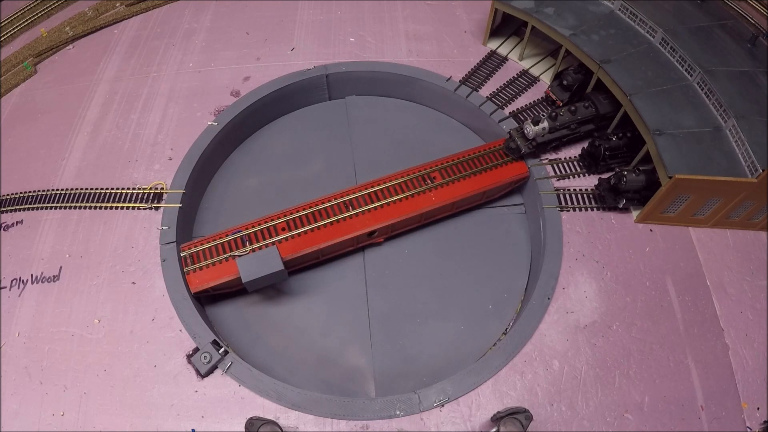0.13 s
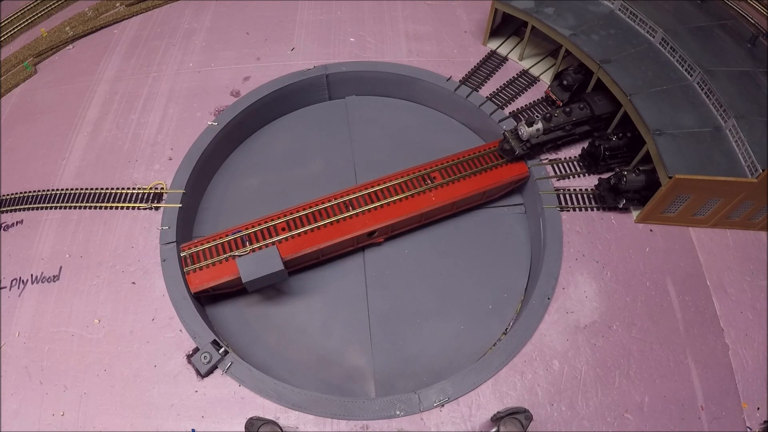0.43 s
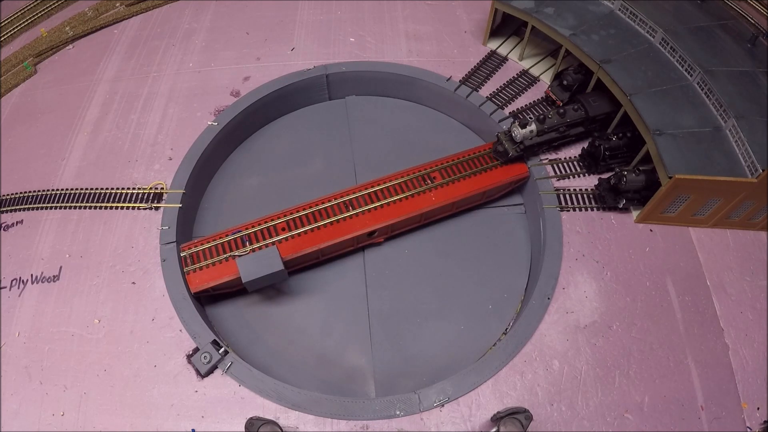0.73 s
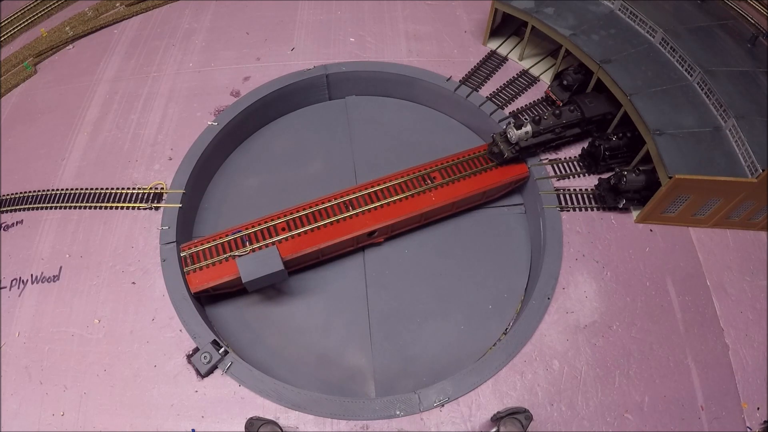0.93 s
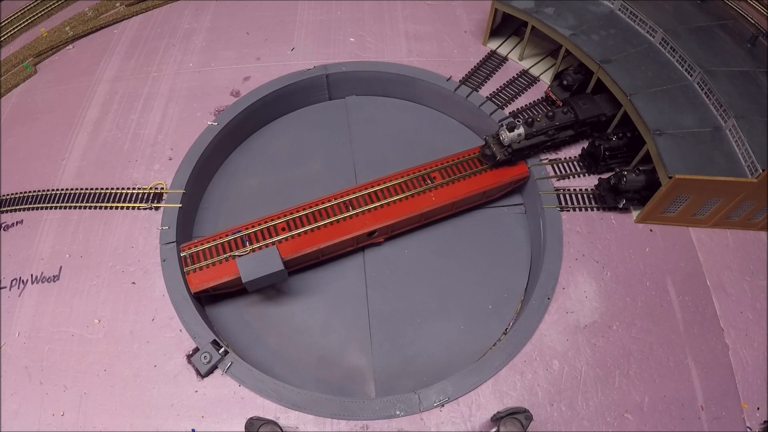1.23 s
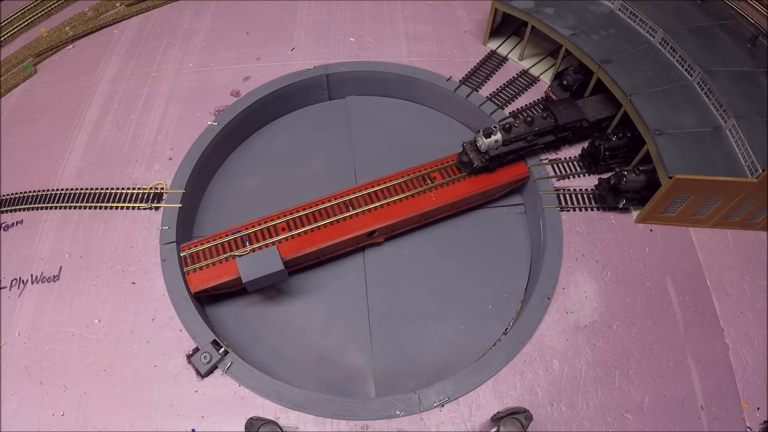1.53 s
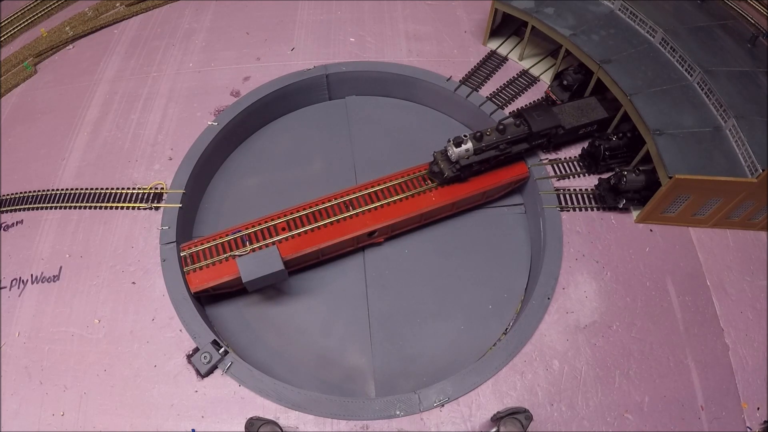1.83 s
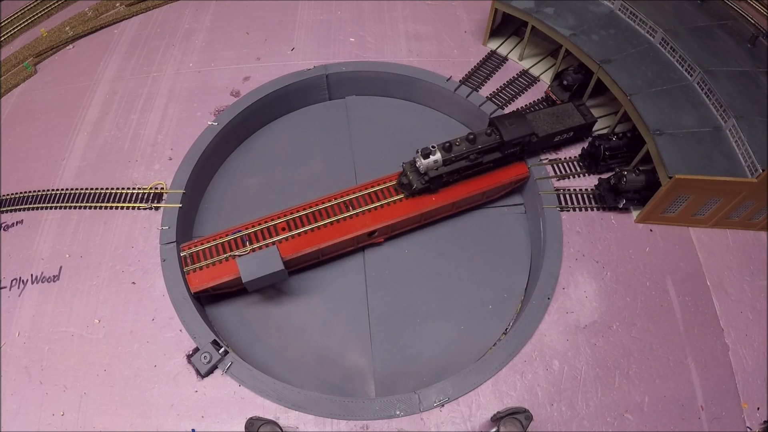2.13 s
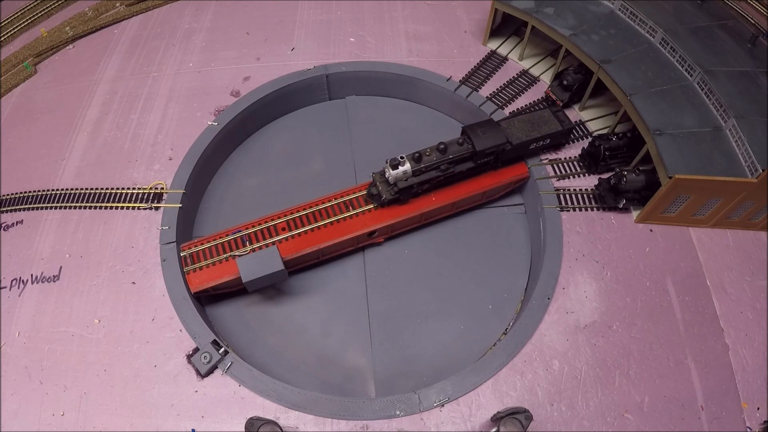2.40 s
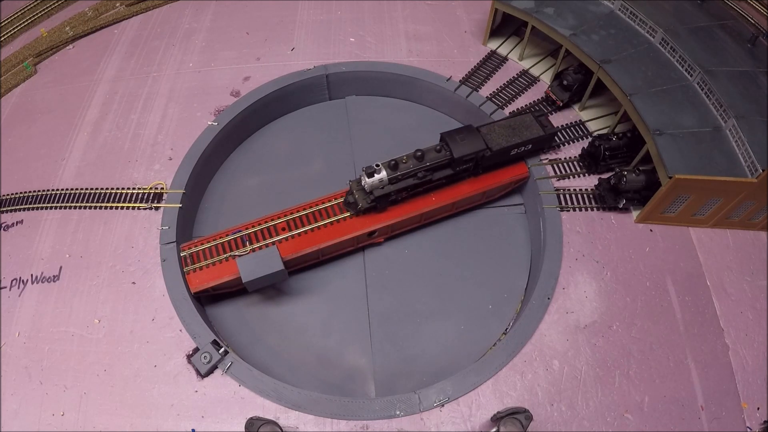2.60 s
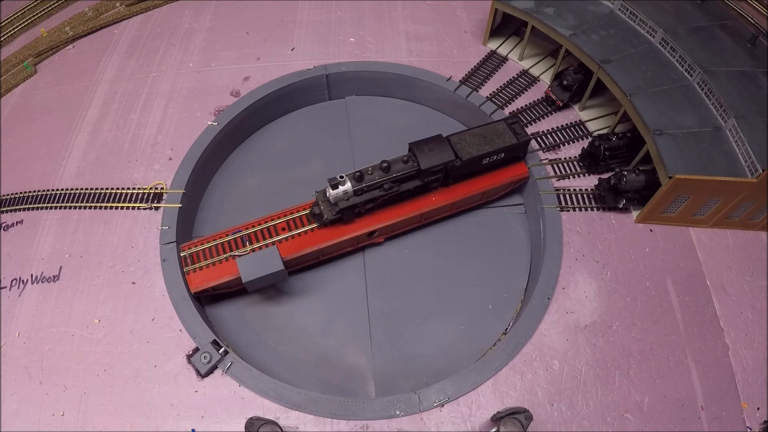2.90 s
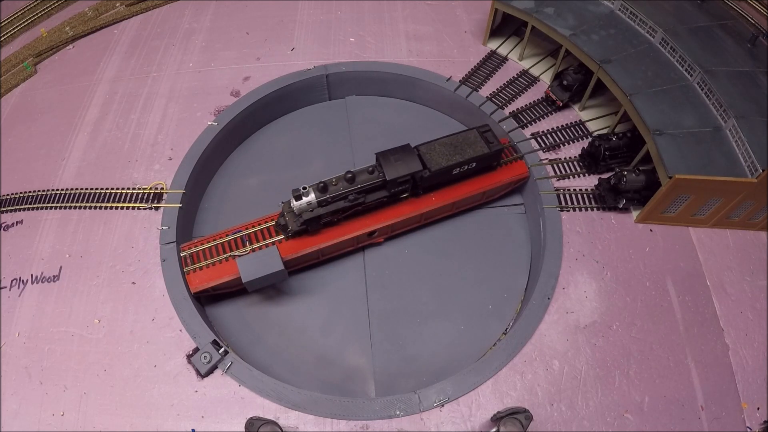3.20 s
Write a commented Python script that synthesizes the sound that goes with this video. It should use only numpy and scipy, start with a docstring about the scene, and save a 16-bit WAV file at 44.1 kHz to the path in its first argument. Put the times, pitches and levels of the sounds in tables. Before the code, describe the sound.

Deep beating hum over soft low room noise, first almost alone, then a tiny locomotive's gritty wheels, thin motor hiss, rail-gap clicks and dull bridge knocks join it, close microphone, short indoor reverberation.

```python
"""A low hum hangs over a model railway: the harmonics of something turning about twelve times a second,
throbbing as they beat. A small locomotive creeps onto the turntable bridge: its wheels grind on the rails
(random tiny impacts through ringing metal), the board rumbles (filtered noise), brief drifting tones swell
and the motor brushes hiss (pulsing noise). The wheels tick over the rail gaps and the bridge knocks
(short bursts of noise), in a small, quiet room."""
import sys
import numpy as np
from scipy import signal
from scipy.fft import rfft, irfft
from scipy.io import wavfile
from scipy.ndimage import uniform_filter1d

SR = 44100
rng = np.random.default_rng(int(sys.argv[2]) if len(sys.argv) > 2 else 0)


def unload_audio(sound):
    """Save the sound as a 16-bit wav file, at the path given as the first command line argument."""
    columns = np.transpose(np.atleast_2d(sound))
    # keep every value between -1 and 1, then stretch to whole-number steps
    steps = np.round(np.clip(columns, -1, 1) * 32767)
    wavfile.write(sys.argv[1], SR, steps.astype(np.int16))


N = 147735

# how loud the rolling is over time: time_s, wheel_level_db, board_level_db
ROLLING = [(0, -70, -49.5), (1.15, -64, -51.5), (1.35, -55, -42.5), (1.55, -51.5, -40), (1.8, -49.5, -36.5),
           (2.1, -49, -43), (2.4, -49.5, -38), (2.7, -51.5, -44.5), (3.1, -53.5, -42), (3.35, -56, -40.5)]


def undb(db):
    """Turn decibels into a gain."""
    return 10 ** (np.asarray(db) / 20)


def seconds():
    """Time of every sample."""
    return np.arange(N) / SR


def curve(table, axis=1):
    """One column of a table, joined by straight lines in time."""
    rows = np.array(table, float)
    return np.interp(seconds(), rows[:, 0], rows[:, axis])


def unit(x):
    """Scale to an average (rms) level of 1."""
    return x / np.sqrt(np.mean(x ** 2))


def colour(x, points):
    """Filter x by a tone curve of (Hz, dB) points, then scale to rms 1."""
    hz, db = np.array(points, float).T
    bins = np.maximum(np.fft.rfftfreq(N, 1 / SR), 1)
    gain = undb(np.interp(np.log(bins), np.log(hz), db))
    return unit(irfft(rfft(x) * gain, N))


def noise(points):
    """Noise with the given tone curve, at rms 1."""
    return colour(rng.standard_normal(N), points)


def walk(rate):
    """Slow random drift with a spread near 1, from about `rate` random values a second, smoothed."""
    hold = int(SR / rate)
    steps = np.repeat(rng.standard_normal(N // hold + 1), hold)
    smooth = uniform_filter1d(uniform_filter1d(steps, hold), hold)
    return unit(smooth[:N])


def resonate(x, rings):
    """Add resonances to x; each swells and fades as the contact points move."""
    swell_db, swells_per_s = 3.5, 12
    out = x
    for hz, width, db in rings:
        ring = signal.lfilter(*signal.iirpeak(hz, hz / width, fs=SR), x)
        out = out + undb(db + swell_db * walk(swells_per_s)) * ring
    return out


def strike(start, attack, t60):
    """Loudness of a blow: a quick rise and an exponential fall (60 dB in t60 seconds)."""
    age = np.maximum(seconds() - start, 0)
    return (1 - np.exp(-age / attack)) * np.exp(-np.log(1000) * age / t60)


def tone(angle):
    """A cosine at rms 1."""
    return np.sqrt(2) * np.cos(angle)


def air():
    """Steady room noise with faint, thin, steady whines."""
    # tone of the room noise: pitch_hz, level_db
    air_colour = [(20, 16), (40, 14.5), (85, 19), (130, 10), (200, 4.5), (300, -4.5), (450, -13.5),
                  (700, -16), (1200, -22), (2300, -24.5), (3200, -30), (5000, -32), (8200, -31),
                  (10500, -31), (12500, -39.5), (15000, -49)]
    # faint steady whines: pitch_hz, level_db
    whines = [(8211, -80.5), (12288, -89)]
    air_db = -33.5
    out = undb(air_db) * noise(air_colour)
    for hz, db in whines:
        out = out + undb(db) * np.sqrt(2) * np.sin(2 * np.pi * hz * seconds())
    return out


def room(x):
    """Nearby walls return a short, blurred tail, made here from fading noise."""
    t60_s, tail_db = 0.34, -10.5
    tail = rng.standard_normal(N) * strike(start=0.0035, attack=0.0024, t60=t60_s)
    tail = tail / np.linalg.norm(tail)
    return x + undb(tail_db) * signal.fftconvolve(x, tail)[:N]


def drifting_tones():
    """Brief drifting tones: swells of the hum's 6th harmonic and later its 12th and 13th, the board droning and
    the rail singing."""
    # the tones: start_s, length_s, pitch_hz, width_hz (sets size and speed of the drift), level_db
    tone_table = [(0.7, 0.57, 70, 9, -33), (1.35, 0.3, 306, 20, -45.5), (1.726, 0.13, 312, 14, -47),
                  (1.98, 0.2, 154, 10, -38), (2.19, 0.25, 163, 9, -37), (2.21, 0.06, 490, 90, -47),
                  (1.98, .035, 3450, 130, -57), (2.018, 0.02, 3630, 200, -57)]
    out = 0
    for start, length, hz, width, db in tone_table:
        progress = np.clip((seconds() - start) / length, 0, 1)
        swell = np.sqrt(np.maximum(np.sin(np.pi * progress), 0))
        pitch_hz = hz + .5 * width * walk(4 * width)
        phase = 2 * np.pi * np.cumsum(pitch_hz) / SR
        out = out + swell * undb(db + 1.8 * walk(width)) * np.sqrt(2) * np.sin(phase)
    return out


def board():
    """The baseboard rumbles under the rolling weight and rings at its resonances."""
    # tone of the rumble: pitch_hz, level_db
    board_colour = [(60, 6), (130, -6.5), (220, -1.5), (270, -5.5), (308, -3), (335, -6.5), (470, -11),
                    (540, -29), (900, -45)]
    # resonances of the board: pitch_hz, width_hz, gain_db
    board_rings = [(212.3, 14, -5), (304, 13, -3), (466, 29, -4.5)]
    rumble = resonate(noise(board_colour), board_rings)
    return unit(rumble) * undb(curve(ROLLING, axis=2))


def knocks():
    """Dull thuds of the bridge taking the load, with a brief ring of its deck."""
    # the bridge knocking under the wheels: start_s, thud_db, ring_db
    knock_table = [(1.566, -26.5, -51), (1.826, -34.5, -48), (2.08, -37, -46.5), (2.22, -37, -58),
                   (2.383, -34, -54), (2.71, -27, -68), (2.872, -31.5, -40.5), (2.93, -36.5, -62)]
    # tone of the thuds: pitch_hz, level_db
    knock_colour = [(40, -28), (140, 7.5), (200, -1), (290, -0.5), (380, -12.5), (600, -44), (1500, -59)]
    # ringing tones of the deck: pitch_hz, level_db (added to ring_db), t60_s
    bridge_modes = [(863, 2, 0.1), (824, -8, 0.16), (893, -12, 0.052), (2410, -5, 0.062)]
    thud_shape, ring = 0, 0
    for start, thud_db, ring_db in knock_table:
        thud_shape = thud_shape + undb(thud_db) * strike(start, attack=0.0046, t60=0.3)
        for hz, db, t60 in bridge_modes:
            wave = np.sin(2 * np.pi * hz * (seconds() - start))
            ring = ring + undb(ring_db + db) * strike(start, attack=0.0021, t60=t60) * wave
    return noise(knock_colour) * thud_shape + ring


def ticks():
    """The wheels click over the rail gaps: short bursts of noise."""
    # the ticks: start_s, level_db
    tick_table = [(0.446, -48.5), (1.228, -43), (1.256, -45), (1.367, -49), (1.49, -43.5), (1.571, -44),
                  (1.77, -41), (1.814, -41.5), (1.886, -42), (2.29, -41), (2.374, -41), (2.53, -41),
                  (2.871, -43.5), (2.97, -48), (3.058, -43.5), (3.09, -44)]
    # tone of the ticks: pitch_hz, level_db
    tick_colour = [(300, 6), (900, 4), (1500, 3), (2500, -3), (3600, -2), (5000, -9.5), (9000, -12.5),
                   (15000, -39)]
    shape = sum(undb(db) * strike(start, attack=.001, t60=.06) for start, db in tick_table)
    return noise(tick_colour) * shape


def brushes():
    """Brushes hiss on the commutator, swelling once and twice a motor turn."""
    # how loud the hiss is: time_s, level_db
    brush_level = [(0, -80), (1.15, -69.5), (1.35, -64.5), (1.65, -60), (1.85, -62.5), (2.2, -59),
                   (2.7, -59), (3.17, -60), (3.25, -64), (3.35, -71)]
    # tone of the hiss: pitch_hz, level_db
    brush_colour = [(3000, -11.5), (5000, -7.5), (5400, -2.5), (5800, -7), (6250, 6), (7000, -5),
                    (7500, 0.5), (8300, 2), (9000, -3.5), (10000, -5), (11200, -22), (12600, -6),
                    (13400, -3), (14200, -14), (15500, -8)]
    motor_hz, swell_depth = 105.5, .14
    turns_per_s = motor_hz * (1 + 0.022 * walk(3.3))
    angle = 2 * np.pi * np.cumsum(turns_per_s) / SR
    swell = 1 + swell_depth * (np.cos(2 * angle) + np.cos(angle))
    return noise(brush_colour) * swell * undb(curve(brush_level))


def wheels():
    """Tiny impacts of wheels on gritty rail ring the metal; the gears drive them in uneven surges."""
    # tone of the grinding: pitch_hz, level_db
    wheel_colour = [(400, 7), (600, 7.5), (1000, 2.5), (1700, 3.5), (2400, 0.5), (3000, -3), (3800, -5),
                    (4800, -9.5), (7000, -13.5), (10000, -27), (15000, -23)]
    # resonances of the metal: pitch_hz, width_hz, gain_db
    wheel_rings = [(810, 64, -13.5), (1346, 145, -2), (2435, 130, -6.5), (3510, 160, -6.5)]
    hits_per_s, hit_spread_db, hit_limit_db = 500, 3.5, 10
    hit = rng.random(N) < hits_per_s / SR
    hit_db = np.minimum(hit_spread_db * rng.exponential(size=N), hit_limit_db)
    grit = hit * rng.choice([-1, 1], N) * undb(hit_db)
    # smooth noise fills in between the hits
    grind = colour(unit(grit) + .8 * rng.standard_normal(N), wheel_colour)
    # a fast and a slow random drift of the level, in dB
    surge_db = 1.0 * walk(90) + .5 * walk(14)
    return unit(resonate(grind, wheel_rings)) * undb(curve(ROLLING) + surge_db)


def hum():
    """Harmonics of one slow rotation; 4th and 5th beat once a turn, 8th to 10th about a third of a turn later."""
    # the rotation: time_s, turns_per_s, fifth_harmonic_db, fourth_harmonic_db, ninth_harmonic_db
    rotation = [(0.0, 11.7, -23.0, -28, -30), (0.1, 11.71, -22.0, -28, -30), (0.26, 11.9, -17.0, -40, -26),
                (0.52, 11.62, -19.0, -23, -27), (0.72, 11.78, -17.0, -22, -26),
                (0.86, 11.83, -17.0, -35, -27), (1.1, 11.7, -15.0, -27, -23.5),
                (1.3, 11.67, -15.3, -23.5, -23.5), (1.56, 11.71, -15.5, -22, -25),
                (1.61, 11.73, -23.0, -29, -27), (1.69, 11.97, -33.0, -38, -32),
                (1.8, 12.23, -18.5, -38, -41), (1.95, 13.2, -26.5, -37, -62),
                (2.14, 13.63, -43.0, -41, -54), (2.27, 13.45, -31.0, -43, -59),
                (2.42, 12.75, -23.5, -44, -57), (2.62, 11.78, -23.0, -36, -49),
                (2.9, 11.5, -20.5, -39, -39), (3.04, 10.7, -31.0, -45, -51), (3.2, 10.74, -29.0, -46, -47),
                (3.35, 10.68, -27.0, -41, -43)]
    # brief dips of the 4th and 5th harmonics: centre_s, change_db
    dips = [(0.447, -5), (1.597, -11), (2.21, -10), (2.64, -12), (3.07, -10), (3.23, -10)]
    # how loud the 10th harmonic is: time_s, level_db
    tenth = [(0, -47), (.75, -56), (1, -28), (1.5, -55), (1.9, -55), (2.7, -64), (2.92, -32.5), (3.25, -31),
             (3.35, -31.5)]
    # weaker harmonics: multiple, level_db, share (of the 5th's rise and fall that they follow)
    overtones = [(3, -46.5, 0.61), (6, -41, 0), (7, -44, 0.36), (11, -57, 0), (13, -53, 0)]
    first_throb_s, upper_lag_turns, dip_s = .06, .323, .014
    eighth_db = -7  # relative to the 9th
    wobble_db, wobble_rad = 2, 1.3

    rate, fifth_db = curve(rotation), curve(rotation, axis=2)
    angle = 2 * np.pi * (np.cumsum(rate) / SR - first_throb_s * rate[0])
    late_angle = angle - 2 * np.pi * upper_lag_turns

    dip_db = sum(db * np.exp(-((seconds() - centre) / dip_s) ** 2) for centre, db in dips)
    fifth = undb(fifth_db) * tone(5 * angle)
    fourth = undb(curve(rotation, axis=3)) * tone(4 * angle)
    main = undb(dip_db) * (fifth + fourth)

    eighth_and_ninth = tone(9 * late_angle) + undb(eighth_db) * tone(8 * late_angle)
    upper = undb(curve(rotation, axis=4)) * eighth_and_ninth
    upper = upper + undb(curve(tenth)) * tone(10 * late_angle)

    swing_db = fifth_db - fifth_db.mean()
    rest = 0
    for multiple, db, share in overtones:
        level_db = db + share * swing_db + wobble_db * walk(3.8)
        rest = rest + undb(level_db) * tone(multiple * angle + wobble_rad * walk(3))
    return main + upper + rest


def scene():
    """Hum, locomotive and room noise in one channel; only wheels, brushes and ticks get the room's tail."""
    in_room = room(wheels() + brushes() + ticks())
    return (air() + in_room + drifting_tones() + board() + knocks() + hum())[None]


def record(dry):
    """A steep low-pass filter cuts the top of the treble."""
    top_hz = 15200
    # 14th order, 0.1 dB ripple below the cut, at least 80 dB down above it
    low_pass = signal.ellip(14, .1, 80, top_hz, fs=SR, output="sos")
    return signal.sosfilt(low_pass, dry)


dry = scene()
out = record(dry)
unload_audio(out)
```